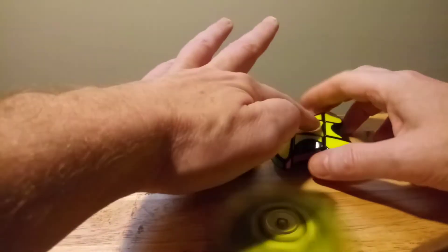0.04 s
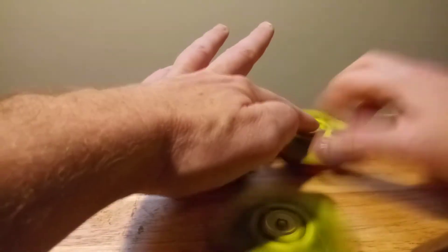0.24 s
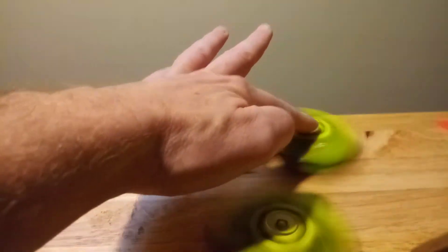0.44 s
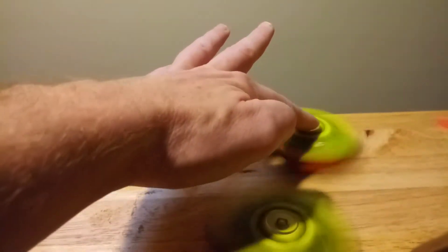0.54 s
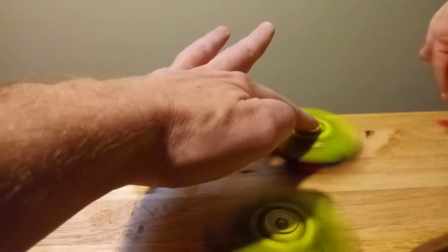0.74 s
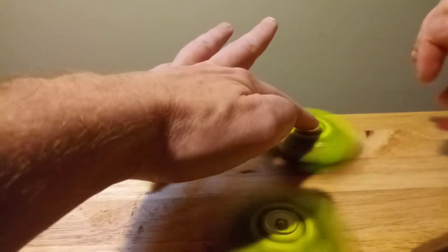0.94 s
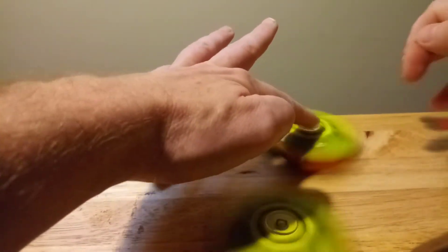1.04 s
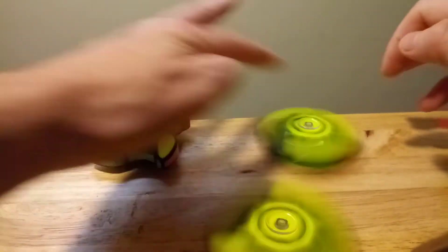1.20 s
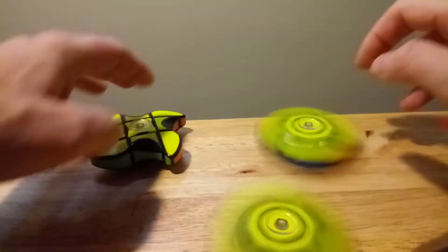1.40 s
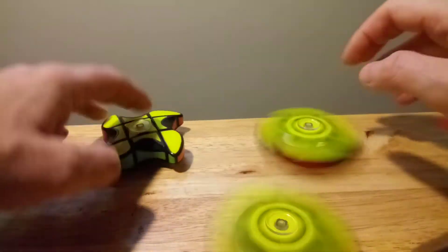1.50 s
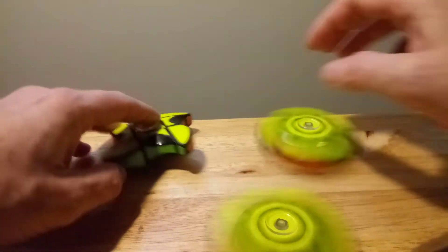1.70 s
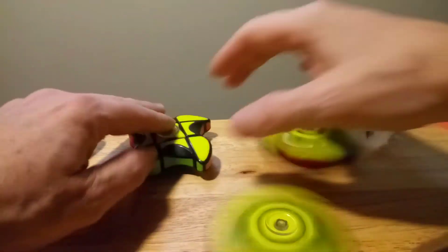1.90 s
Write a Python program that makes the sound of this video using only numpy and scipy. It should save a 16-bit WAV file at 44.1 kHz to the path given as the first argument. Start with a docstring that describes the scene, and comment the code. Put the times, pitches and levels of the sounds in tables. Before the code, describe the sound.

A plastic spinner puzzle is flicked on a wooden table: faint finger ticks, then a very sharp, bright snap at 0.2 s with short room reverberation. A buzzing, humming wobble fades by about 0.5 s. Quiet bearing whir runs throughout, with small ticks and a soft table bump near 1.0 s. At 1.65 s a hollow plastic clack, rattle and scuff, then light ticks around 1.75 s. Close, quiet room.

```python
"""A plastic spinner puzzle is flicked with a sharp snap and wobbles on its bearing under a fingertip.
Bursts of noise and ringing tones make the snap and the hollow knocks of the puzzle as it is gripped.
Tiny random contacts fed to resonances make the whir, rattling, scuffs and finger rubs.
Fingers bump the wooden table; the small room adds reverberation and a faint noise."""
import sys
import numpy as np
from scipy import signal
from scipy.fft import rfft, irfft
from scipy.io import wavfile
from scipy.ndimage import uniform_filter1d

SR = 44100
rng = np.random.default_rng(int(sys.argv[2]) if len(sys.argv) > 2 else 0)


def master_out(mix):
    """Clip the mix to full scale and print it as 16-bit PCM to the path in sys.argv[1]."""
    frames = np.transpose(np.atleast_2d(mix))
    ceiling = np.clip(frames, -1, 1)
    pcm = np.round(ceiling * 32767).astype(np.int16)
    wavfile.write(sys.argv[1], SR, pcm)


N = 85995
T = np.arange(N) / SR   # time in seconds

# Ringing tones of the hollow puzzle body, shared by knocks and rattles.
# Each row: pitch in Hz, level in dB, time to fade by 60 dB in seconds.
BODY_TONES = [(219, -50.5, 0.11), (807, -35.5, 0.025), (971, -34, 0.03), (1662, -33.5, 0.046),
              (1740, -29, 0.017), (2357, -41.5, 0.03), (4030, -53.5, 0.024), (6064, -46.5, .018),
              (11460, -56, 0.015)]


def from_db(db):
    """Turn decibels into a gain."""
    return 10 ** (np.asarray(db) / 20)


def rms_one(x):
    """Scale a signal to an rms (average strength) of one."""
    return x / np.sqrt(np.mean(x ** 2) + 1e-20)


def curve(rows):
    """Gain over time, joining rows of seconds and dB by straight lines in dB."""
    return from_db(np.interp(T, *np.transpose(rows)))


def at_hz(points, hz):
    """Read a table between its rows, with frequency on a log axis."""
    table_hz, values = np.transpose(points)
    return np.interp(np.log(hz + 1e-9), np.log(table_hz), values)


def noise(spectrum):
    """Random noise coloured by a table of Hz and dB, scaled to an rms of one."""
    white = rfft(rng.standard_normal(N))
    hz = np.arange(N // 2 + 1) * SR / N
    return rms_one(irfft(white * from_db(at_hz(spectrum, hz)), N))


def swell(start, length):
    """A rounded rise and fall, like half a sine wave."""
    return np.sin(np.pi * np.clip((T - start) / length, 0, 1))


def clicks(times, dbs):
    """Single-sample clicks at the given times and levels."""
    out = np.zeros(N)
    places = np.clip(np.round(np.asarray(times) * SR).astype(int), 0, N - 1)
    np.add.at(out, places, from_db(dbs))
    return out


def ring(x, hz, t60):
    """Each click sets off a fading sine of its own height; deep bass does not radiate."""
    decay = np.exp(-np.log(1000) / (t60 * SR))   # per sample
    step = 2 * np.pi * hz / SR                   # turn of the sine per sample
    feedback = [1, -2 * decay * np.cos(step), decay * decay]
    rung = signal.lfilter([0, np.sin(step)], feedback, x + 1e-18)
    return signal.lfilter(*signal.butter(2, hz / 3, "high", fs=SR), rung)


def cracks(times, dbs, spectrum, rise_s, t60):
    """Each contact sets off its own burst of dense, quickly dying vibration."""
    out = np.zeros(N)
    for start, db in zip(times, dbs):
        age = np.maximum(T - start, 0)
        fade = np.exp(-np.log(1000) * age / t60)
        out += from_db(db) * noise(spectrum) * (1 - np.exp(-age / rise_s)) * fade
    return out


def rubbed(modes, pressure):
    """Dense tiny contacts excite steep-sided resonances; pressure sets the loudness over time."""
    grains_per_s, grain_spread_db = 2500, 3.5
    out = np.zeros(N)
    for hz, width_hz, db in modes:
        happens = rng.random(N) < grains_per_s / SR
        direction = rng.choice([-1, 1], N)
        size = from_db(grain_spread_db * np.minimum(rng.exponential(1, N), 4))
        grains = happens * direction * size
        # Two equal filters in a row, each twice the listed width, make the steep sides.
        b, a = signal.iirpeak(hz, hz / (2 * width_hz), fs=SR)
        run_in = np.concatenate([grains[-N // 4:], grains])   # already sounding at the start
        rung = signal.lfilter(b, a, signal.lfilter(b, a, run_in))[-N:]
        out += from_db(db) * rms_one(rung)
    return out * pressure


def turning(rate_hz, depth):
    """Slightly uneven rise and fall of bearing load."""
    unevenness = rms_one(uniform_filter1d(rng.standard_normal(N), SR // 20))
    turns = np.cumsum(rate_hz * (1 + 0.17 * unevenness)) / SR
    return 1 + np.clip(depth, 0, 1) * np.sin(2 * np.pi * turns)


def waver(rate_hz):
    """Slow random drift with an rms of one."""
    return noise([(rate_hz / 2, 0), (rate_hz, -6), (rate_hz * 10, -80), (rate_hz * 20, -160)])


def tone(hz):
    """A sine that follows a pitch curve."""
    return np.sin(2 * np.pi * np.cumsum(hz) / SR)


def whine(hz):
    """A thin tone whose pitch wavers at random."""
    depth_hz, rate_hz = 27, 40
    return tone(hz + depth_hz * waver(rate_hz))


def room(x):
    """Reverberation: a tail of noise bands about half an octave wide, each fading at its own rate."""
    # Loudness of the tail. Each row: frequency in Hz, relative level in dB per Hz.
    tail_colour = [(150, 3.5), (500, -0.5), (4000, -1), (5400, 1.5), (7200, 2), (8500, 1), (15000, -0.5)]
    # How long the tail lasts. Each row: frequency in Hz, time to fade by 60 dB in seconds.
    tail_t60 = [(200, 0.24), (1500, 0.37), (6000, 0.33), (10000, .26), (15000, 0.21)]
    delay_s, build_s = 0.0049, 0.0022
    bend = 0.99   # 1 fades evenly in dB; above 1 holds on at first, then falls faster
    t = np.maximum(T[:N // 3] - delay_s, 0)
    edges = np.geomspace(90, 18000, 16)   # band edges in Hz
    tail = np.zeros(len(t))
    for low, high in zip(edges, edges[1:]):
        hz = np.sqrt(low * high)
        band_filter = signal.butter(2, [low, high], "band", fs=SR, output="sos")
        band = signal.sosfilt(band_filter, rng.standard_normal(len(t)))
        fade = np.exp(-np.log(1000) * (t / at_hz(tail_t60, hz)) ** bend)
        tail += band * from_db(at_hz(tail_colour, hz)) * fade
    tail *= 1 - np.exp(-t / build_s)
    return signal.fftconvolve(x, tail / np.sqrt(np.sum(tail ** 2)))[:N]


def flick():
    """The plastic edge snaps free and strikes again; each contact cracks, rings and fills the room."""
    # Contacts of the flick. Each row: start in seconds, relative level in dB.
    contacts = [(0.2075, 3), (0.2105, 1.5), (0.2121, -2.5), (0.2343, -15.5), (0.2387, -21)]
    # Ring of the flicked edge. Each row: pitch in Hz, level in dB, time to fade by 60 dB in seconds.
    edge_tones = [(367, -42, 0.046), (666, -38, 0.02), (1003, -33.5, 0.02), (1676, -35.5, 0.022),
                  (2360, -33.5, 0.016), (3240, -29.5, 0.011), (5667, -23, 0.014), (5963, -19.5, 0.013),
                  (6350, -22, 0.014), (7193, -27, .011), (15400, -36.5, .007)]
    # Colour of each crack. Each row: frequency in Hz, relative level in dB per Hz.
    crack_colour = [(80, -29.5), (400, -1), (1400, -2), (4300, 1.5), (6400, -1.5), (8200, -3.5),
                    (13000, -10), (15500, -2)]
    crack_db, crack_rise_s, crack_t60_s = -18.5, 0.00059, 0.011
    crack_room_db, ring_room_db = -8, -11.5   # how much of each reaches the room
    out = np.zeros(N)
    for start, level in contacts:
        crack = cracks([start], [level + crack_db], crack_colour, crack_rise_s, crack_t60_s)
        edge = np.zeros(N)
        for k, (hz, db, t60) in enumerate(edge_tones):
            edge += (-1) ** k * ring(clicks([start], [level + db]), hz, t60)   # alternate signs
        into_room = from_db(crack_room_db) * crack + from_db(ring_room_db) * edge
        out += crack + edge + room(into_room)
    return out


def wobbling():
    """Just after the flick the puzzle rattles, its shell rings in pulses and the table hums."""
    # Wobble until the puzzle runs true. Each row: time in seconds, relative level in dB.
    wobble_level = [(0.19, -96), (0.24, -10), (0.275, 2), (0.335, -2.5), (0.42, -9.5), (0.455, -22),
                    (0.49, -27), (0.64, -88.5)]
    # What the wobble shakes. Each row: pitch in Hz, width in Hz, level in dB.
    shaken_parts = [(142, 53, -58.5), (321.8, 35, -61.5), (970, 74, -62.5), (1747, 60, -56.5)]
    wobble_hz, wobble_depth = 45.7, 0.4
    shell_hz, shell_db = 1664, -51.5
    hum_hz, hum_sag_hz_per_s, hum_db = 155, 50, -50.5
    hum_follows = 0.69   # share of the wobble's swing in dB that the table hum follows
    load = turning(wobble_hz, wobble_depth)
    shell = from_db(shell_db) * whine(shell_hz)
    hum_pitch = hum_hz - hum_sag_hz_per_s * (T - wobble_level[0][0])
    hum = from_db(hum_db) * tone(hum_pitch)
    strength = curve(wobble_level)
    shaking = rubbed(shaken_parts, load) + shell * load
    return strength * shaking + strength ** hum_follows * hum


def spinning():
    """The bearings whir through table and shells and whine faintly throughout."""
    # Resonances of the whir. Each row: pitch in Hz, width in Hz, level in dB.
    whir_tones = [(159, 13, -70), (212, 11, -73.5), (268.2, 8.6, -68.5), (345, 37, -71), (663, 47, -80.5),
                  (980, 180, -82.5), (1666, 80, -81), (2205, 560, -90), (6080, 680, -85.5)]
    # Whir over time. Each row: time in seconds, relative level in dB.
    whir_level = [(0, 0.5), (0.55, -1.5), (1.02, 1.5), (1.12, -1.5), (1.23, 1), (1.45, -1.5), (1.62, 3),
                  (1.87, -10)]
    # Thin whines of the bearings. Each row: pitch in Hz, level in dB.
    whine_tones = [(1675, -79.5), (5150, -95.5)]
    turn_hz, turn_depth = 13, 0.18
    whine_flutter = 0.55   # random swing in loudness, as a share
    load = curve(whir_level) * turning(turn_hz, turn_depth)
    whines = np.zeros(N)
    for hz, db in whine_tones:
        whines += from_db(db) * whine(hz) * (1 + whine_flutter * waver(turn_hz))
    return rubbed(whir_tones, load) + whines * load


def knocks():
    """Loose pieces strike the hollow body; each point of contact favours some of its ringing tones."""
    # Knocks and ticks. Each row: start in seconds, relative level in dB, most excited pitch in Hz,
    # fall away from that pitch in dB per octave.
    strikes = [(0.057, -24, 1700, 13.5), (0.056, -37, 5300, 22), (0.07, -22, 6960, 3),
               (0.117, -13, 7000, 17), (0.496, -20.5, 715, 19), (0.596, -23.5, 1610, 41),
               (0.818, -23.5, 910, 10), (0.939, -28.5, 1650, 11.5), (1.303, -25.5, 1840, 8),
               (1.560, -21.5, 1752, 13.5), (1.579, -20.5, 1700, 33), (1.6576, 3.5, 1210, 2),
               (1.676, -9, 1720, 5), (1.756, -14, 2310, 23.5), (1.787, -20, 2320, 21.5)]
    # Colour of each crack. Each row: frequency in Hz, relative level in dB per Hz.
    knock_colour = [(150, -13), (700, -4.5), (1300, -7.5), (2700, -2.5), (4900, -23), (6700, -10),
                    (9500, -26.5), (15000, -25)]
    crack_db, crack_rise_s, crack_t60_s = -49.5, 0.0012, 0.064
    crack_hz = 4957   # the pitch at which each strike's strength is read for its crack
    start, level, centre_hz, fall = np.transpose(strikes)

    def drive_db(hz):
        """How strongly each strike excites a pitch."""
        return level - fall * np.abs(np.log2(hz / centre_hz))

    rings = np.zeros(N)
    for k, (hz, db, t60) in enumerate(BODY_TONES):
        rings += (-1) ** k * ring(clicks(start, drive_db(hz) + db), hz, t60)
    return rings + cracks(start, drive_db(crack_hz) + crack_db, knock_colour, crack_rise_s, crack_t60_s)


def rattles():
    """Loose pieces chatter in runs; every tiny contact strikes each body tone with its own strength."""
    # Runs of chatter. Each row: start in seconds, length in seconds, relative level in dB,
    # most excited pitch in Hz.
    runs = [(0.994, 0.071, -30.5, 1970), (1.175, .16, -35.5, 2470), (1.645, 0.069, -19.5, 2160),
            (1.747, 0.076, -30, 2318)]
    touches_per_s, spread_db = 300, -1.5
    fall_db = 23   # away from the most excited pitch, per octave
    out = np.zeros(N)
    touches = rng.random(N) < touches_per_s / SR
    for hz, tone_db, t60 in BODY_TONES:
        force = np.zeros(N)
        for start, length, db, centre_hz in runs:
            drive_db = db - fall_db * np.abs(np.log2(hz / centre_hz))
            force += swell(start, length) * from_db(drive_db)
        direction = rng.choice([-1, 1], N)
        sizes = direction * from_db(tone_db + spread_db * rng.standard_normal(N))
        out += ring(touches * sizes * force, hz, t60)
    return out


def scuff():
    """The gripped puzzle scuffs along the table, where friction excites a few resonances."""
    # Resonances of the scuff. Each row: pitch in Hz, width in Hz, level in dB.
    scuff_tones = [(229, 42, -49.5), (330, 47, -53.5), (767, 194, -52.5), (1016, 65, -54),
                   (2320, 450, -63.5)]
    start_s, length_s = 1.657, 0.069
    return rubbed(scuff_tones, swell(start_s, length_s))


def bumps():
    """Soft pushes make the table top hum briefly, with a little friction."""
    # Bumps of fingers and puzzle. Each row: start in seconds, length in seconds, level in dB, pitch in Hz.
    pushes = [(-0.02, 0.098, -56.5, 158.3), (0.17, 0.032, -49.5, 360.5), (0.661, 0.062, -57, 300),
              (1.0, 0.086, -49, 246), (1.008, 0.025, -58, 152.4), (1.169, 0.091, -59.5, 340.7)]
    friction_width_hz, friction_share = 72, 0.4845
    out = np.zeros(N)
    for start, length, db, hz in pushes:
        hum = np.sin(2 * np.pi * hz * (T - start))
        friction = rubbed([(hz, friction_width_hz, 0)], friction_share)
        out += from_db(db) * (hum + friction) * swell(start, length)
    return out


def fingertips():
    """Skin drags on the plastic in faint scrapes."""
    # Slides of the fingertips. Each row: start in seconds, length in seconds, relative level in dB.
    slides = [(0.047, 0.045, -0.5), (0.114, 0.33, 3), (1.651, 0.092, -2.5)]
    # Resonances under the finger. Each row: pitch in Hz, width in Hz, level in dB.
    skin_tones = [(1530, 620, -69), (4334, 280, -80.5), (6580, 260, -73.5)]
    pressure = sum(from_db(db) * swell(start, length) for start, length, db in slides)
    return rubbed(skin_tones, pressure)


def room_background():
    """Steady coloured noise of the quiet room."""
    # Colour of the background. Each row: frequency in Hz, relative level in dB per Hz.
    background_colour = [(25, -12.5), (60, -1), (130, -3), (300, 2.5), (1200, -12), (2500, -19),
                         (3800, -28.5), (6500, -24), (8300, -33.5), (13500, -30.5), (15400, -23)]
    return from_db(-71.5) * noise(background_colour)


def scene():
    """Clicks with their reverberation over whir, handling and room background."""
    grip_room_db = -15
    # Two independent layers of chatter play at once.
    grip = knocks() + rattles() + rattles() + scuff()
    grip_in_room = grip + from_db(grip_room_db) * room(grip)
    handling = flick() + grip_in_room + bumps() + fingertips()
    return (handling + wobbling() + spinning() + room_background())[None]


def record(dry):
    """A steep filter cuts the top above 16100 Hz."""
    top_cut = signal.ellip(10, 0.2, 80, 16100, fs=SR, output="sos")
    return signal.sosfilt(top_cut, dry)


dry = scene()
out = record(dry)
master_out(out)
```